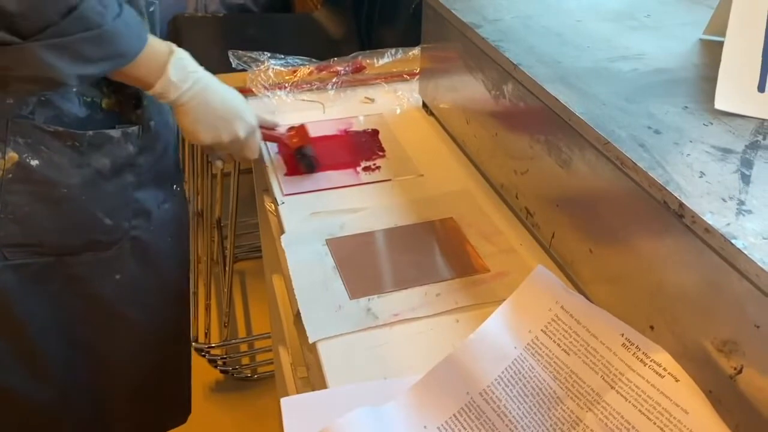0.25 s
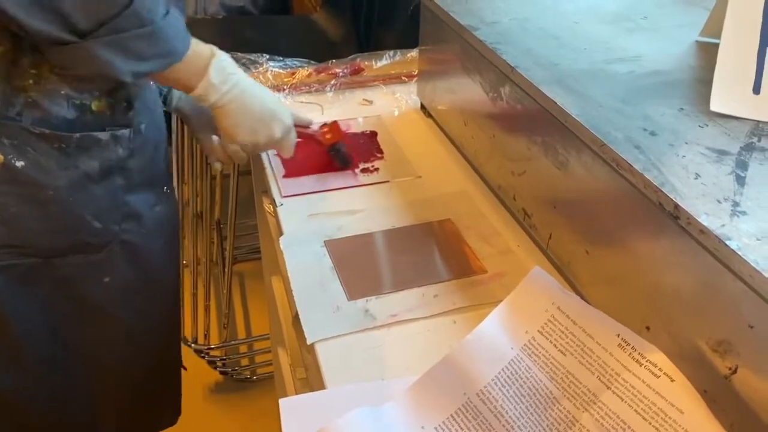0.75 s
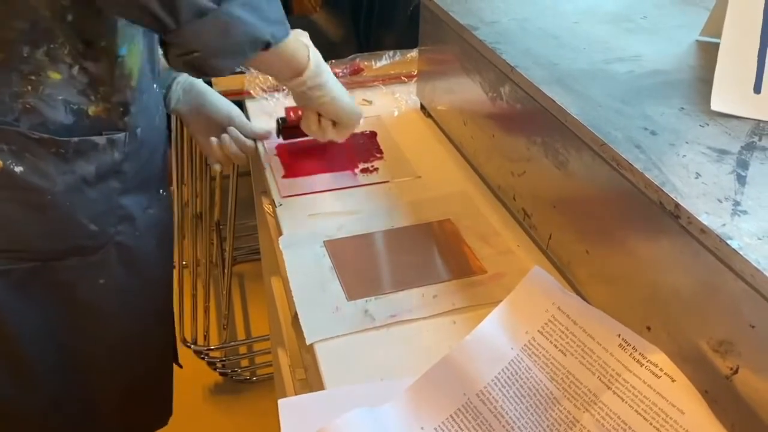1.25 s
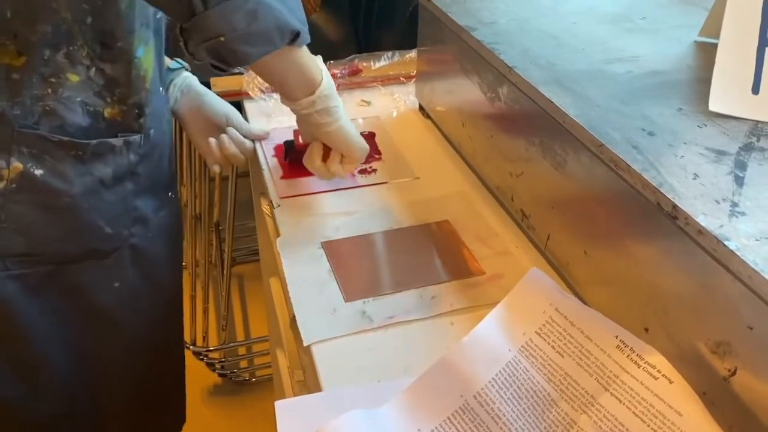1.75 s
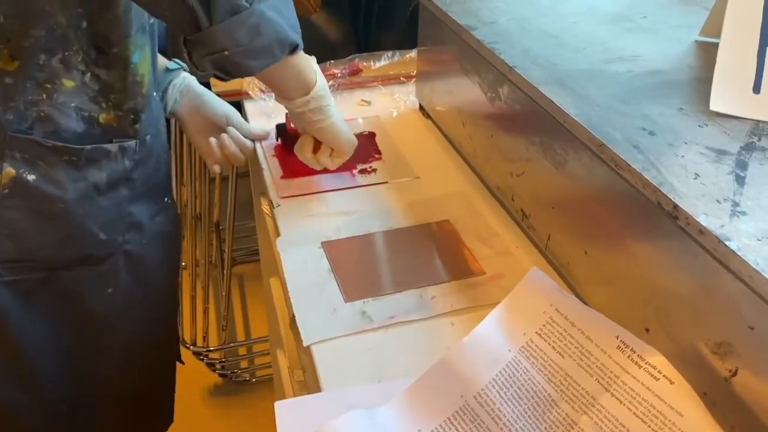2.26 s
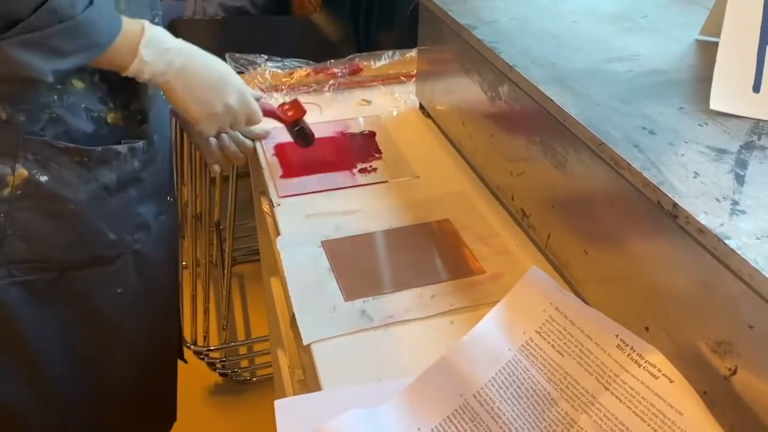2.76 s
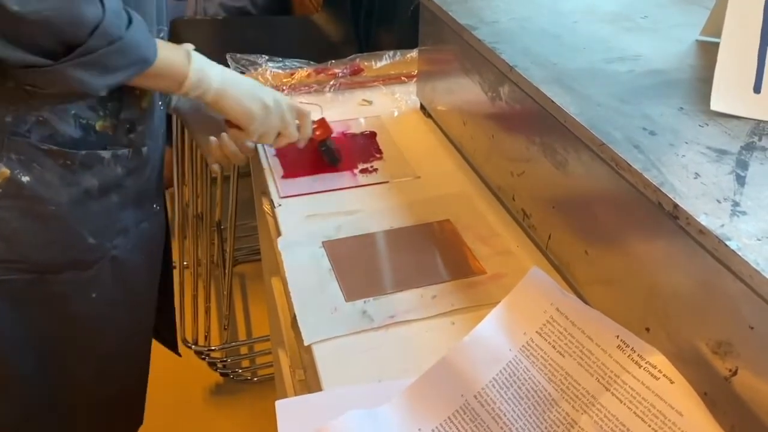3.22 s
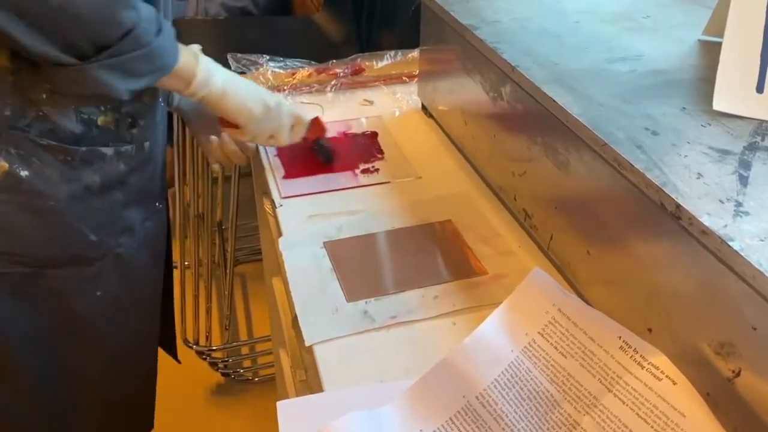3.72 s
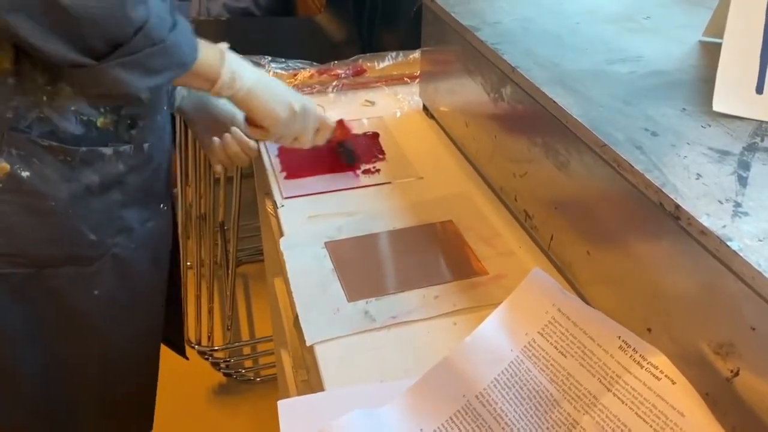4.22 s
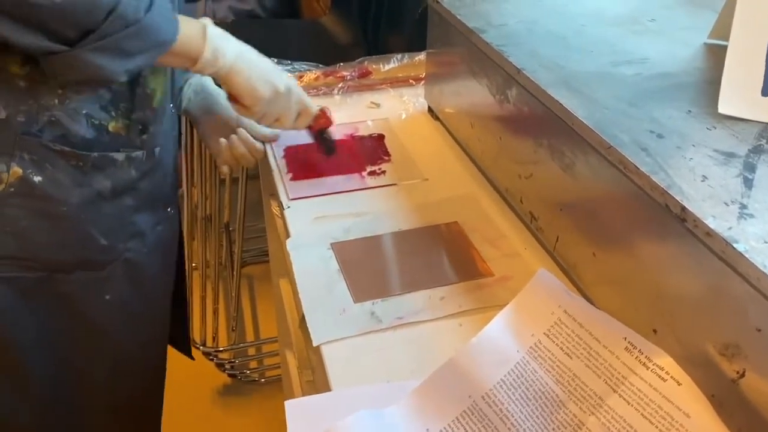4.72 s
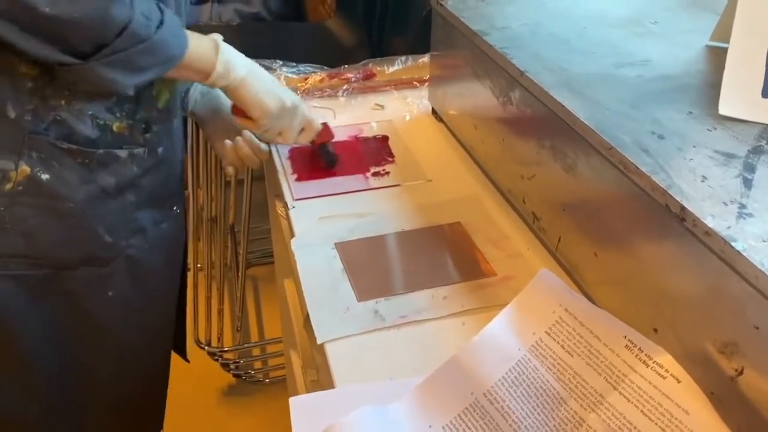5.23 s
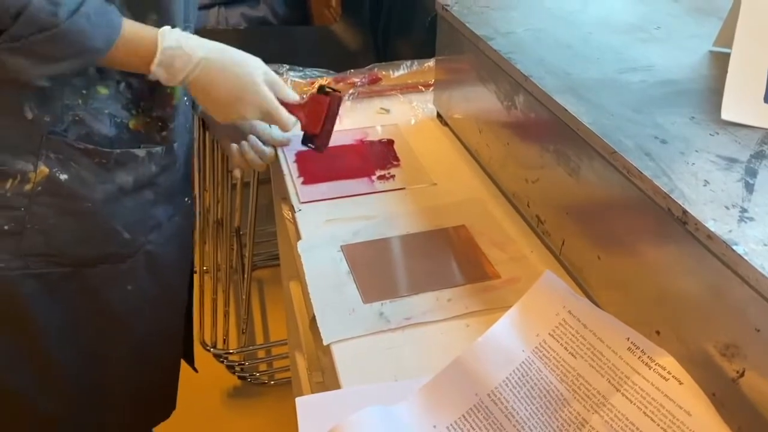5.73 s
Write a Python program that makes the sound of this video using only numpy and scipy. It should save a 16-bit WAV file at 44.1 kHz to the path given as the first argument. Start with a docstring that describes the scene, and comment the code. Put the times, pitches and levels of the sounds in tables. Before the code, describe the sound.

In an echoing workshop with humming ventilation, an ink roller lands on a slab with a metallic clack and a hollow thud, then rolls to and fro with a sticky hiss, soft rumble and little pops. This happens three times, then four quicker knocks follow, each with a short stroke. The roller sits a little to the left, its axle ticking, its heaviest landings overloading the microphone. A sleeve rustles faintly.

```python
"""A hand roller spreads tacky ink on a slab in a hollow workbench, a little left of the microphone.
Each time it is set down its metal frame clacks and slab and bench thud, loud enough to overload the
microphone. Each stroke hisses as the ink film splits, the roll rumbles and pops, the loose axle ticks.
The workshop echoes the knocks and pops; behind them a sleeve rustles briefly, a faint wash of room
sound swells under the later knocks, and the ventilation hums."""
import sys
import numpy as np
from scipy import signal
from scipy.fft import rfft, irfft, next_fast_len
from scipy.io import wavfile

SR = 44100
rng = np.random.default_rng(int(sys.argv[2]) if len(sys.argv) > 2 else 0)


def dump(signal):
    """Clip the signal to [-1, 1] and save it as 16-bit WAV at the path in sys.argv[1]."""
    limited = np.clip(np.atleast_2d(signal).T, -1, 1)
    pcm = np.round(limited * 32767).astype(np.int16)
    wavfile.write(sys.argv[1], SR, pcm)


N = 263707
TIME = np.arange(N) / SR
AGE = TIME[:SR]   # seconds since a knock
SIDES = np.array([[-.5], [.5]])   # splits a phase lead between left and right
# The frame's crowd of small modes. Each row: frequency in Hz, relative level in dB, t60 in seconds.
FRAME_CHATTER = [(600, 0.5, 0.018), (1410, 10.5, 0.014), (2444, -3.5, 0.097), (3280, 19.5, 0.065),
                 (4200, -14, 0.054), (6420, -1.5, 0.13), (7950, -27.5, 0.035), (10560, -5, 0.045),
                 (13000, -32, 0.02), (16000, -34, .01)]


def knocks():
    """All that the roller strikes: hard set-downs, lighter bumps and the ticks of its axle."""
    axle = axle_ring()
    clacks = [frame_clack() for _ in range(3)]
    thuds = [slab_thud() for _ in range(4)]   # each spot on the slab answers a little differently
    bench = bench_thud()
    return set_downs(clacks, thuds, bench, axle) + roll_bumps(thuds, bench) + axle_ticks(axle)


def set_downs(clacks, thuds, bench, axle, rebound_db=-8, rebound_s=0.0074):
    """The frame strikes and rebounds; just after its first hit the rubber roll shakes slab and bench."""
    # Each row: start in seconds, clack gain in dB, corner pitch in Hz, frame and axle gains in dB, seconds
    # until the roll lands, slab gain in dB, contact cutoff in Hz, bench and boom gains in dB.
    blows = [(0.2435, -12.5, 2600, -44, -25, 0.0013, 5.5, 695, -6, -2),
             (1.3315, -15.5, 1950, -34, -30, 0.0019, 0, 710, 2, -11),
             (3.0178, -10, 6000, 4.5, -21.5, 0.0036, -9.5, 710, -5, -15.5),
             (4.1440, -6.5, 10300, -13, -6.5, 0.0041, 1.5, 890, -2.5, -9.5),
             (4.5018, -9.5, 1900, -3, -24.5, 0.0014, 3, 1450, -2, -2),
             (4.8420, -3.5, 1400, 4.5, -18, 0.0019, 2, 2940, 2.5, 0),
             (5.1620, -9.5, 5600, 3, -19.5, 0.0037, -3.5, 970, -1.5, -17)]
    # The metal frame's ring and the deep boom, in rows as ring() reads them.
    frame_modes = [(3030, -37.5, 0.18, .0003, 0.4), (3227, -28.5, 0.12, 0.00023, -0.12),
                   (3320, -23.5, 0.12, .0003, .5), (3348, -7, 0.0077, 0.00035, -0.76),
                   (5740, -17, 0.0089, 0.0001, 0.068), (5905, -36.5, 0.063, .0003, 0.8)]
    boom_modes = [(55, -23, .3, .03, .9), (76, -8, .25, .02, 1), (84, -7, .33, .02, 1),
                  (111, -15, .16, .02, .3)]
    frame, boom = ring(frame_modes), ring(boom_modes)
    out = np.zeros((2, N))
    for k, blow in enumerate(blows):
        s, clack_db, corner_hz, frame_db, axle_db, wait, slab_db, contact_hz, bench_db, boom_db = blow
        metal = rattling(from_db(frame_db) * frame + from_db(axle_db) * axle)
        add(out, s, from_db(clack_db) * corner(clacks[k % len(clacks)], corner_hz) + metal)
        rebound = corner(clacks[(k + 1) % len(clacks)], corner_hz)
        add(out, s + rebound_s, from_db(clack_db + rebound_db) * rebound)
        thud = from_db(slab_db) * soften(thuds[k % len(thuds)], contact_hz)
        add(out, s + wait, thud + from_db(bench_db) * bench + from_db(boom_db) * boom)
    return out


def frame_clack(crack_db=11, chatter_db=15.5):
    """Metal meets the slab with a crack, and the frame chatters briefly."""
    # The contact. Each row: frequency in Hz, relative level in dB, t60 in seconds.
    crack = [(507, 3, 0.012), (1448, -9, 0.0074), (2280, 18.5, 0.021), (3160, 14.5, 0.0044),
             (4000, -24.5, 0.0052), (5700, 17.5, 0.013), (7860, -3.5, 0.0023), (10700, -19.5, 0.0038),
             (13170, -19.5, 0.004), (16400, -23.5, 0.003)]
    return from_db(crack_db) * burst(crack) + from_db(chatter_db) * burst(FRAME_CHATTER)


def corner(clack, hz, octaves=.4, lift_db=4.5):
    """The corner of the frame that touches first rings most, lifting its own band."""
    half = 2 ** (octaves / 2)
    edges = [hz / half, min(hz * half, SR / 2 - 1000)]
    band = signal.sosfilt(signal.butter(1, edges, "band", fs=SR, output="sos"), clack)
    return clack + (from_db(lift_db) - 1) * band


def rattling(sound, rattle_db=3.5):
    """Loose metal parts touch as they ring, so the level wavers."""
    return sound * from_db(rattle_db * flutter(per_s=740, size=SR))


def slab_thud(crowd_db=23.5):
    """The slab answers with a few clear modes and a crowd of small ones."""
    # The clear modes, in rows as ring() reads them.
    slab_modes = [(384, 2, 0.045, 0.0019, 0.38), (399.4, -3.5, 0.21, 0.015, 4.1),
                  (444.3, 3, 0.096, 0.0086, 1.8), (479, -19.5, 0.12, 0.00067, 1.4),
                  (555.6, -1.5, 0.082, 0.0081, 1.9), (610, -15, 0.037, 0.0015, 2.4),
                  (671.5, -10, 0.082, 0.00067, 1.3), (816, -20.5, 0.15, 0.0031, 1),
                  (988, -8.5, 0.053, .001, 1.7), (1210, -15.5, 0.069, 0.00084, 0.74),
                  (1384.5, -23, 0.32, 0.0028, 1.2), (1910, -22.5, 0.042, 0.00077, 0.47)]
    # The crowd. Each row: frequency in Hz, relative level in dB, t60 in seconds.
    crowd = [(60, -14, 0.11), (130, -4, 0.3), (296, -8.5, 0.36), (412, 9, 0.049), (703, 1, 0.2),
             (1030, -8.5, 0.17), (2380, -6.5, 0.072), (4000, -16, 0.2), (9000, -43, .05)]
    return ring(slab_modes) + from_db(crowd_db) * burst(crowd)


def soften(thud, hz):
    """A softer contact holds less treble."""
    return signal.sosfilt(signal.butter(2, min(hz, SR / 2 - 1000), fs=SR, output="sos"), thud)


def bench_thud(lead_rad=0.23, onset_s=0.009):
    """A bending wave passes through the hollow bench, falling in pitch, and the bench rings on."""
    # The first passage. Each row: pitch in Hz, level in dB, arrival and spread in seconds.
    packets = [(266.2, -0.5, 0.01, 0.012), (226.4, -2, 0.02, 0.017), (159.2, -7.5, 0.036, 0.02),
               (114, -29.5, 0.055, 0.0067)]
    # The bench's ring, in rows as ring() reads them.
    bench_modes = [(159, -8, 0.28, 0.033, 0.089), (183.4, -15.5, 0.34, 0.027, .1),
                   (219, -15, 0.14, 0.014, 0.23), (234.2, -20, 0.62, 0.059, 0.27),
                   (267.9, -11, 0.29, 0.015, 1)]
    wave = 0
    for hz, db, arrival, spread in packets:
        swell = from_db(db) * np.exp(-((AGE - arrival) / spread) ** 2)
        wave = wave + swell * np.sin(2 * np.pi * hz * AGE + SIDES * lead_rad)
    return wave * np.minimum(AGE / onset_s, 1) + ring(bench_modes)


def strokes(ease_s=0.041, overlap_s=0.009, light_touch_db=-5, hiss_power=1.07, rumble_power=1.02):
    """Push and pull alternate; speed and pressure set the strength of hiss and rumble."""
    # Runs of strokes. Each row: start and end in seconds, stroke count, push hiss, pull hiss and
    # rumble in dB, seconds the hand takes to lean in.
    runs = [(-0.12, 0.124, 1, -50.5, -52, -39.5, .02), (0.241, 0.967, 4, -46.5, -47, -39, .02),
            (1.344, 2.521, 7, -52.5, -45, -44.5, 0.018), (3.026, 3.928, 5, -46.5, -45.5, -35.5, 0.35),
            (4.12, 4.35, 1, -47.5, -43, -32.5, 0.014), (4.487, 4.701, 1, -48.5, -47.5, -31, .02),
            (4.825, 5.067, 1, -50.5, -49, -30, .02), (5.204, 5.435, 1, -49, -50, -38, .02)]
    hiss, rumble = np.zeros(N), np.zeros(N)
    for start, end, count, push_db, pull_db, rumble_db, lean_s in runs:
        turns = np.linspace(start + ease_s, end - ease_s, round(count) + 1)
        turns[0], turns[-1] = start, end   # the first and last stroke take longer
        lean = np.clip((TIME - start) / lean_s, 0, 1) ** 2
        pressure = from_db(light_touch_db * (1 - lean))
        for k, (begin, finish) in enumerate(zip(turns, turns[1:])):
            speed = arch((begin + finish) / 2, finish - begin + 2 * overlap_s)
            hiss += pressure * from_db(pull_db if k % 2 else push_db) * speed ** hiss_power
            rumble += pressure * from_db(rumble_db) * speed ** rumble_power
    return hiss, rumble


def rolling(hiss, rumble, thread_db=3.0, patchy_db=2.0, uneven_db=3.0):
    """Ink threads snap in a fine hiss, and the uneven roll rumbles on the slab."""
    # Spectra of the ink and the roll. Each row: frequency in Hz, relative level in dB.
    ink_spectrum = [(800, -23), (1800, -18), (3000, -0.5), (4500, -3.5), (6800, 1), (8200, -4.5), (9600, 4),
                    (10900, 6), (12200, -5), (13500, -28.5), (15200, -4.5), (16300, -27), (17000, -25)]
    roll_spectrum = [(50, -4.5), (110, -3), (210, 0.5), (400, -8.5), (700, -8), (950, -16.5), (1350, -20.5),
                     (2000, -25.5), (5000, -42.5)]
    threads = from_db(patchy_db * flutter(per_s=78)) * noise(ink_spectrum, size=N, grain_db=thread_db)
    roll = from_db(uneven_db * flutter(per_s=90)) * noise(roll_spectrum, size=N)
    return hiss * threads + rumble * roll


def pops(rumble, t60=0.1, grit=0.46, lead_rad=1.65, peel_s=0.0013):
    """The tacky roll sticks and lets go: a short, gritty ring of the slab that swells as the ink peels."""
    # The distinct pops. Each row: start in seconds, level in dB, pitch in Hz.
    releases = [(.605, -41, 795), (1.867, -42.5, 894), (1.963, -30, 403), (2.041, -39.5, 658),
                (3.338, -30.5, 648), (3.39, -30.5, 626), (3.464, -30, 670), (3.489, -26.5, 461),
                (3.563, -33.5, 720), (3.625, -28.5, 646)]
    out, age = np.zeros((2, N)), AGE[:SR // 5]
    shape = (1 - np.exp(-age / peel_s)) * from_db(-60 * age / t60)
    for s, gain, hz in [(s, from_db(db), hz) for s, db, hz in releases] + small_pops(rumble):
        tone = np.sin(2 * np.pi * hz * age + SIDES * lead_rad)
        skirt = noise([(hz / 4, -12), (hz, 0), (2 * hz, -13), (10 * hz, -45)], size=len(age))
        add(out, s, gain * shape * (tone + grit * skirt))
    return out


def small_pops(rumble, per_s=26, relative_db=-1, spread_db=1.5, low_hz=382, high_hz=1301):
    """Chance releases, as strong as the roll is fast and heavy. Each row: seconds, gain, pitch in Hz."""
    when, size, pitch, chance = rng.random((400, 4)).T
    s = when * TIME[-1]
    gain = np.interp(s, TIME, rumble) * from_db(relative_db + spread_db * (1 - 2 * size))
    hz = low_hz * (high_hz / low_hz) ** pitch
    heard = (chance < per_s * TIME[-1] / len(s)) & (gain > 1e-4)
    return list(zip(s[heard], gain[heard], hz[heard]))


def roll_bumps(thuds, bench, contact_hz=1800, tick_hz=1500):
    """The roll bumps the slab as it lifts off or settles, and the frame ticks."""
    # Each row: start in seconds, then slab, bench and tick gains in dB.
    bumps = [(.0768, -30.5, -36, -53), (.948, -28, -35.5, -38.5), (2.171, -41, -42.5, -59),
             (2.4773, -29.5, -26, -28), (3.040, -14.5, -24, -40), (3.9045, -29, -37, -38),
             (4.6688, -32, -38, -31.5), (5.3732, -31, -37.5, -29), (5.9489, -48, -47, -43.5)]
    out = np.zeros((2, N))
    for k, (s, slab_db, bench_db, tick_db) in enumerate(bumps):
        thud = from_db(slab_db) * soften(thuds[k % len(thuds)], contact_hz)
        add(out, s, thud + from_db(bench_db) * bench)
        add(out, s, from_db(tick_db) * tick(tick_hz))
    return out


def axle_ticks(axle, ping_db=-3, chatter_db=11):
    """The loose axle drops into its play: it ticks and pings, and the frame chatters."""
    # Each row: start in seconds, gain in dB, centre of the tick in Hz.
    drops = [(0.0932, -34, 3320), (2.4863, -27.5, 2850), (2.5234, -37.5, 6570), (3.1099, -29.5, 5400),
             (3.9849, -32.5, 3300), (4.7506, -45, 6000), (5.787, -38, 2620)]
    out = np.zeros((2, N))
    chatter = from_db(chatter_db) * burst(FRAME_CHATTER)
    for s, db, hz in drops:
        add(out, s, from_db(db) * tick(hz))
        add(out, s, from_db(db) * (chatter + from_db(ping_db) * rattling(axle)))
    return out


def axle_ring(tone_db=-6, buzz_db=-9, buzz_t60=0.14):
    """The axle rings in a few tones and buzzes in its frame."""
    # The tones, in rows as ring() reads them.
    axle_modes = [(3350, -17, 0.39, .0003, -1.2), (3560, -18, 0.46, .0003, -.6),
                  (3440, -2.5, 0.038, .0002, -1), (3774, -27, .1, .0003, .2),
                  (9950, -2.5, .012, 0.00025, .3), (10700, -3.5, .01, .0002, 0)]
    # The narrow buzz. Each row: frequency in Hz, relative level in dB.
    buzz_spectrum = [(1500, -41), (2800, -21), (3350, 8.5), (3600, -2), (4100, -11.5), (5200, -44)]
    buzz = noise(buzz_spectrum, size=SR) * from_db(buzz_db - 60 * AGE / buzz_t60)
    return from_db(tone_db) * ring(axle_modes) + buzz


def tick(hz, t60=0.029):
    """A light dry touch of metal."""
    spectrum = [(hz / 4, -18), (hz / 2, -7), (hz, 0), (2 * hz, -11), (4 * hz, -32), (10 * hz, -55)]
    return noise(spectrum, size=SR // 10) * from_db(-60 * AGE[:SR // 10] / t60)


def from_the_left(sound):
    """The slab lies a little left of the microphone."""
    # Each row: frequency in Hz, left minus right in dB.
    balance = [(40, 13.5), (75, 0), (150, -1), (350, 2.5), (700, 2.5), (1400, 0), (2800, 2.5), (5000, 2.5),
               (10000, -0.1)]
    padded = next_fast_len(N + SR // 10, True)
    half_db = at_hz(balance, np.arange(padded // 2 + 1) * SR / padded) / 2
    return irfft(rfft(sound, padded) * from_db([half_db, -half_db]), padded)[:, :N]


def workshop(build_up_s=0.005):
    """The room's answer to a click: a diffuse echo that builds up and dies by band."""
    # Each row: frequency in Hz, relative level in dB, t60 in seconds.
    echo_bands = [(60, -42, 0.27), (120, -22, 1), (224, -20.5, 1), (415, -26, 0.94), (900, -15.5, 1),
                  (1340, -14.5, 1), (3170, -18.5, 1), (5960, -9.5, 0.44), (10500, -6, 0.22),
                  (14000, -26, .15)]
    return dying_noise(echo_bands) * (1 - np.exp(-AGE / build_up_s)) / np.sqrt(SR / 20)


def rustles_and_wash(flicker_db=3.0):
    """Brief sleeve rustles, and a long faint wash of room sound under the later knocks."""
    # Soft swells of noise. Each row: middle and length in seconds, level in dB.
    swells = [(0.0, 0.21, -62), (1.148, 0.6, -59.5), (2.663, 0.46, -57), (4.756, 3.3, -54.5),
              (5.648, 0.34, -57), (5.98, 0.076, -58)]
    # Their colour. Each row: frequency in Hz, relative level in dB.
    spectrum = [(300, -8), (900, 17.5), (2000, 5.5), (5000, 5.5), (8000, -1.5), (10500, 4), (13000, -19),
                (17000, -19.5)]
    level = sum(from_db(db) * arch(middle, length) for middle, length, db in swells)
    return level * from_db(flicker_db * flutter(per_s=360)) * noise(spectrum, size=N)


def ventilation(level_db=-43.5):
    """Room tone: the steady low hum of moving air."""
    # Each row: frequency in Hz, relative level in dB.
    air_spectrum = [(25, -14), (45, 6), (70, 11), (110, 1.5), (160, 7.5), (210, 0.5), (300, -8.5),
                    (500, -17.5), (1000, -21.5), (3000, -27.5), (6000, -30.5), (11000, -38), (14000, -77)]
    return from_db(level_db) * noise(air_spectrum, size=N)


def ring(modes, bend_delay_s=0.00732):
    """Modes swell and die; low bending waves travel slowly and arrive last (bend_delay_s is for 200 Hz).
    Each row: pitch in Hz, level in dB, t60 and build-up in seconds, lead of the right side in radians."""
    out = 0
    for hz, db, t60, build_up, lead in modes:
        age = np.maximum(AGE - bend_delay_s * 200 / hz, 0)
        shape = (1 - np.exp(-age / build_up)) * from_db(db - 60 * age / t60)
        out = out + shape * np.sin(2 * np.pi * hz * age + SIDES * lead)
    return out


def burst(table):
    """The answer of many close modes to a blow; energy 1."""
    return rms_one(dying_noise(table, size=SR // 4)) / np.sqrt(SR)


def dying_noise(table, size=SR):
    """Half-octave bands of noise, each starting at its own level and dying at its own rate."""
    out, edges = np.zeros((2, SR)), np.geomspace(40, 18000, 19)
    white = [noise([(1, 0), (SR, 0)], size=size + SR // 10) for _ in range(2)]
    for k, (low, high) in enumerate(zip(edges, edges[1:])):
        bandpass = signal.butter(2, [low, high], "band", fs=SR, output="sos")
        band = signal.sosfilt(bandpass, white[k % 2])[:, -size:]
        hz = np.sqrt(low * high)
        t60 = at_hz(table, hz, column=2)
        out[:, :size] += band * from_db(at_hz(table, hz) - 60 * AGE[:size] / t60)
    return out


def noise(spectrum, size, grain_db=0):
    """Stereo noise of a given colour, alike on both sides in the bass, optionally grainy; rms 1."""
    # The sound field at the microphone. Each row: frequency in Hz, left-right correlation.
    likeness = [(40, 1), (150, 0.91), (280, 0.81), (450, 0.27), (700, -0.6), (1400, 0.13), (3000, 0.23),
                (8000, 0.14), (15000, 0.37)]
    padded = next_fast_len(size, True)
    hz = np.arange(padded // 2 + 1) * SR / padded
    grains = from_db(grain_db * rng.standard_normal(padded))
    mid, side = rfft(grains * rng.standard_normal((2, padded)))
    alike = np.clip(at_hz(likeness, hz), -1, 1)
    both = np.sqrt(1 + alike) * mid + np.sqrt(1 - alike) * side * [[1], [-1]]
    return rms_one(irfft(both * from_db(at_hz(spectrum, hz)), padded)[:, :size])


def flutter(per_s, size=N):
    """A random wobble: straight lines between per_s random values a second."""
    knots = rng.standard_normal(int(per_s * size / SR) + 2)
    return np.interp(TIME[:size] * per_s, np.arange(len(knots)), knots)


def arch(middle, length):
    """One smooth swell: from 0 to 1 and back."""
    return np.cos(np.pi * np.clip((TIME - middle) / length, -.5, .5)).clip(0)


def at_hz(points, hz, column=1):
    """One column of a table, read on a log-frequency axis."""
    table = np.array(points)
    return np.interp(np.log(np.maximum(hz, 1)), np.log(table[:, 0]), table[:, column])


def add(out, s, sound):
    """Mix a stereo sound in at s seconds."""
    start = max(round(s * SR), 0)
    part = sound[:, :N - start]
    out[:, start:start + part.shape[1]] += part


def from_db(db):
    return 10 ** (np.asarray(db) / 20)


def rms_one(x):
    return x / np.sqrt(np.mean(x ** 2) + 1e-20)


def scene():
    """Roller and bench a little to the left, the workshop's echo, rustles, wash and ventilation."""
    hiss, rumble = strokes()
    room = workshop()
    background = rustles_and_wash() + ventilation()
    rolled = rolling(hiss, rumble)
    struck = knocks() + pops(rumble)
    echo = signal.fftconvolve(struck, room, axes=1)[:, :N]
    return from_the_left(struck + rolled) + echo + background


def record(dry, cutoff_hz=17100):
    """The loud thuds overload the microphone and flatten at full scale; the highest treble is cut."""
    clipped = dry / (1 + dry ** 8) ** (1 / 8)
    return signal.sosfilt(signal.cheby2(16, 60, cutoff_hz, fs=SR, output="sos"), clipped)


dry = scene()
out = record(dry)
dump(out)
```